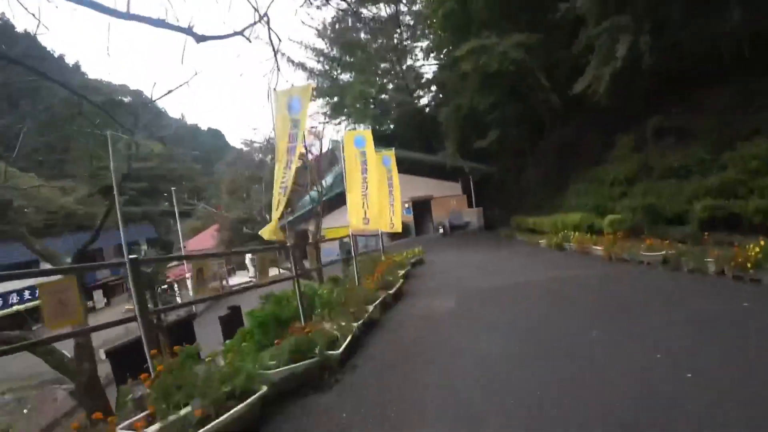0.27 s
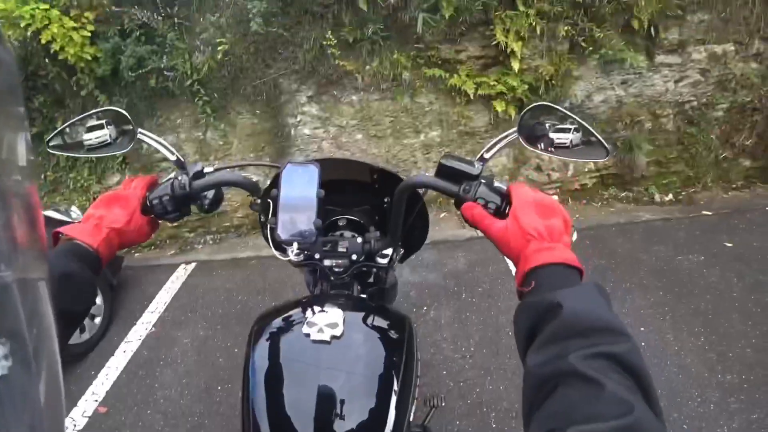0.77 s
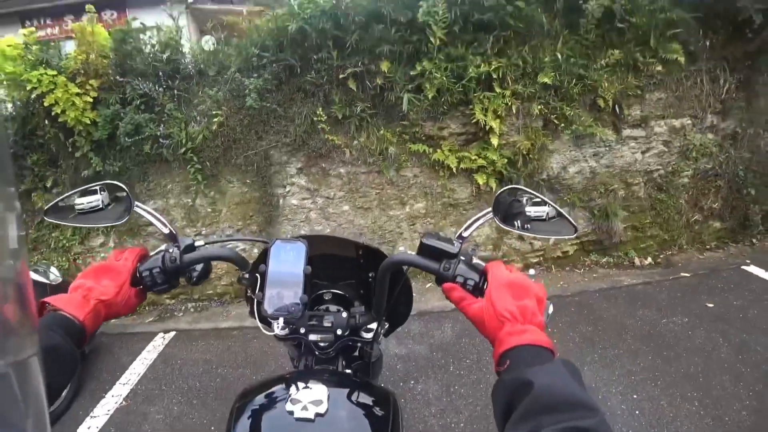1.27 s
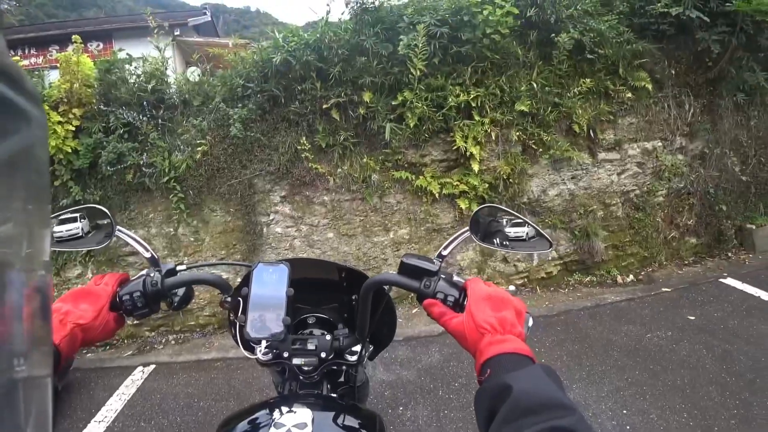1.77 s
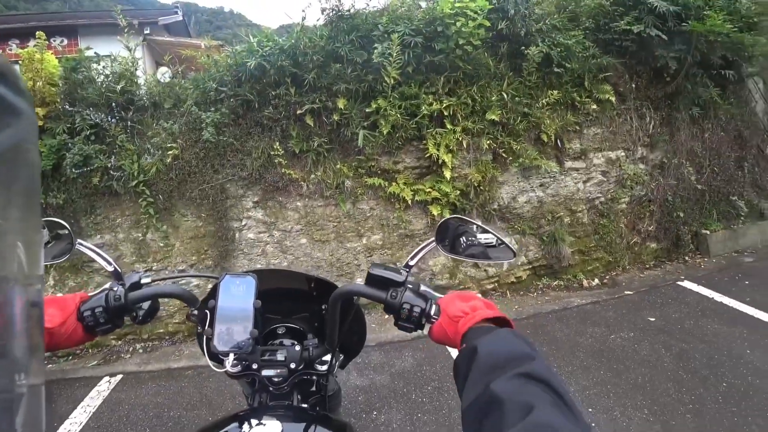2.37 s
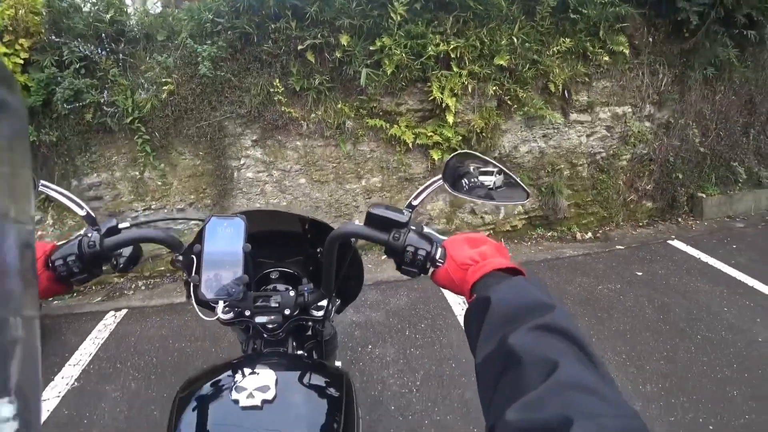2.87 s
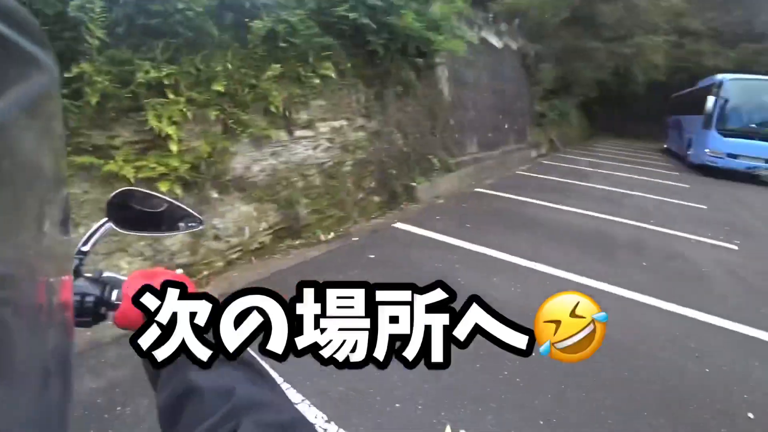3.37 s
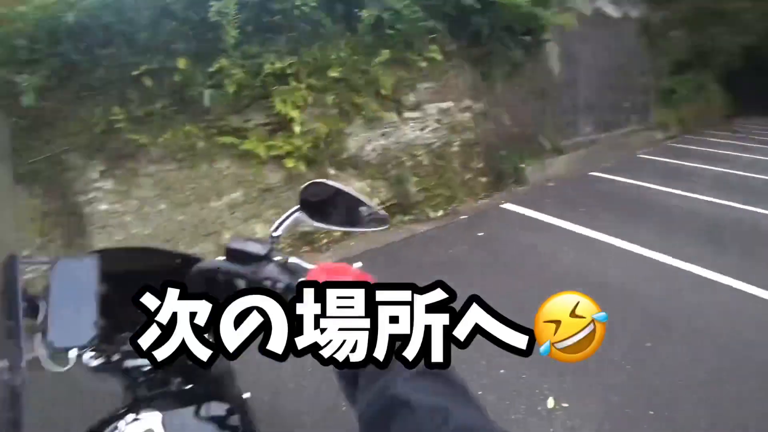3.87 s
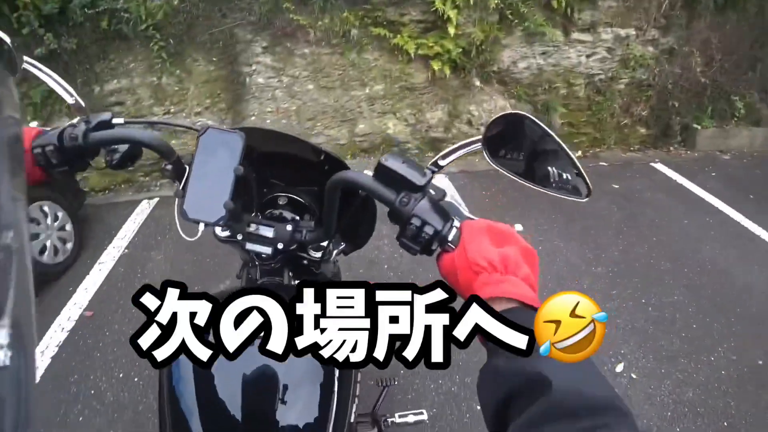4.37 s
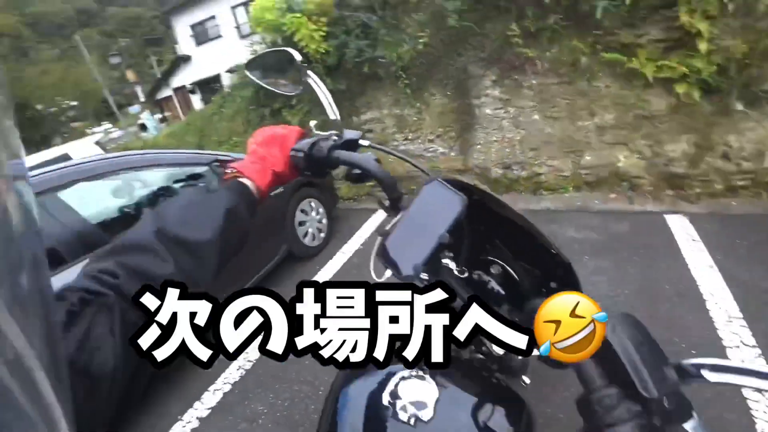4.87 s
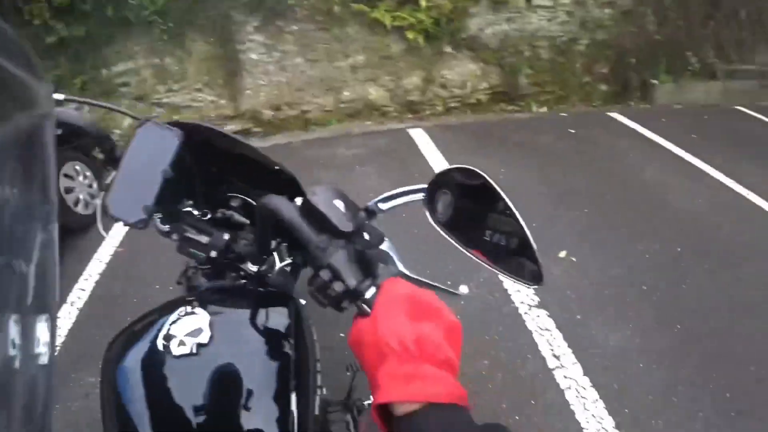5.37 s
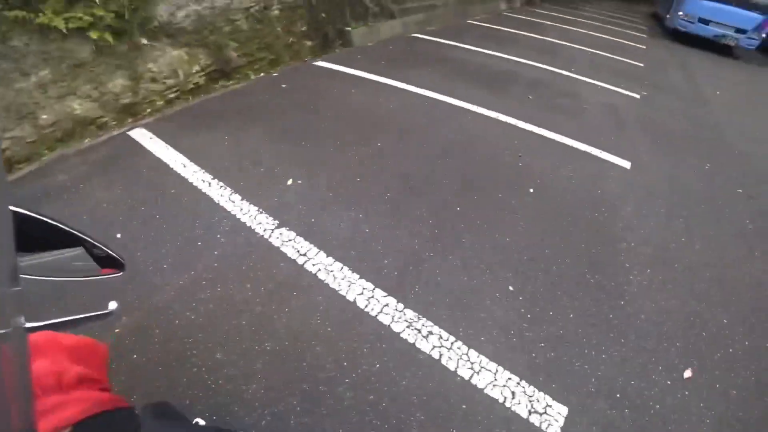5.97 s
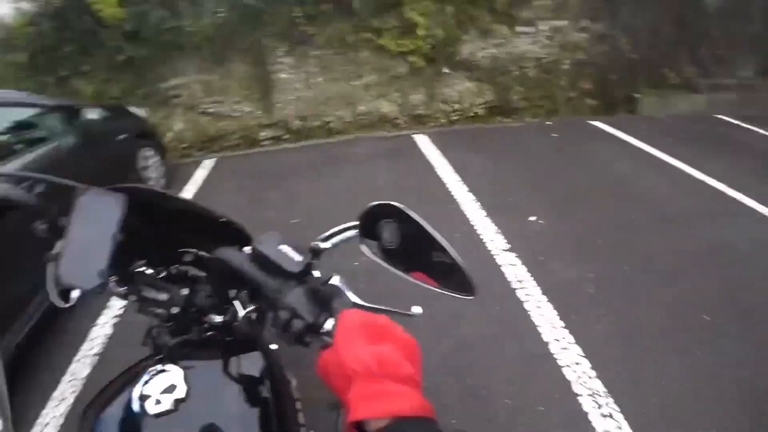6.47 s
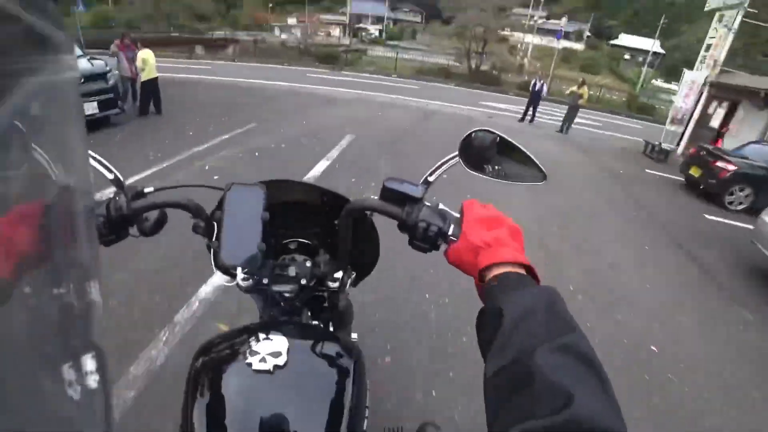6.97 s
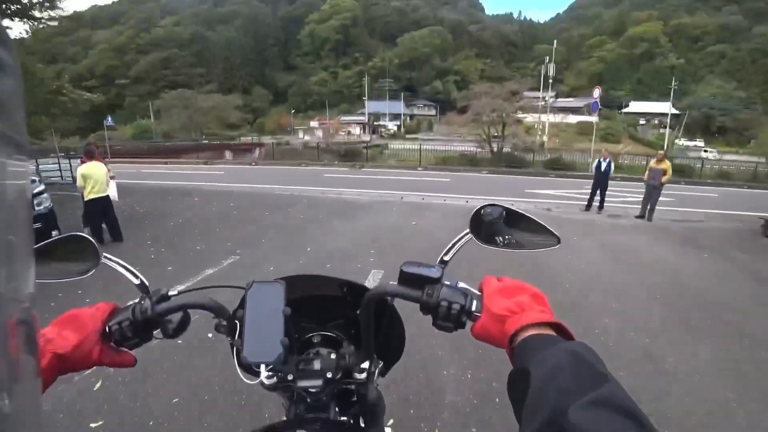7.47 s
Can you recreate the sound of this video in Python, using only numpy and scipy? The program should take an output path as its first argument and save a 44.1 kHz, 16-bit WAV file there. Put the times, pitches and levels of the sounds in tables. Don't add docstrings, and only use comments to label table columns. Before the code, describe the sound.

From 0 to 0.43 s there is only a faint outdoor wash with a few soft wind puffs. A hard cut brings a dull switch thump and short rattle at 0.46 s, with slight handling noises after. At 0.85 s the starter pinion crunches in sharply; gritty gears grind and the motor whine sags against compressions near 1.14, 1.37 and 1.6 s, with low frame kicks. At about 1.65 s a big V-twin catches in ragged pops, flares to its fastest near 2.2 s, then gradually slows from 3 s to a deep, uneven, loping idle by 6 s. Valve clatter, brief cover buzzes, intake chatter and a thin wavering gear whine ride above the exhaust. At 6.67 s a brief dip marks a cut to a slightly faster idle, easing until the end at 7.7 s. Close, dry, nearly mono helmet microphone, loud and limited.

```python
import sys
import numpy as np
from scipy import signal
from scipy.fft import rfft, irfft, next_fast_len
from scipy.io import wavfile
from scipy.ndimage import uniform_filter1d, minimum_filter1d

SR = 44100
rng = np.random.default_rng(int(sys.argv[2]) if len(sys.argv) > 2 else 0)


def persist_wave(psi):
    counts = np.round(np.clip(psi, -1, 1) * 32767).astype(np.int16)
    wavfile.write(sys.argv[1], SR, np.atleast_2d(counts).T)


def volts_from_decibels(level):
    exponent = np.asarray(level, float) / 20
    return 10 ** exponent


N = 340452
T = np.arange(N) / SR


def evened(x):
    return x / np.sqrt(np.mean(x ** 2) + 1e-20)


def curve(rows, column=1, rest=-120.):
    rows = np.asarray(rows, float)
    return np.interp(T, rows[:, 0], rows[:, column], rest, rest)


def coloured(points):
    f, db = np.transpose(points)
    size = next_fast_len(N)
    log_hz = np.log(np.fft.rfftfreq(size, 1 / SR) + 1)
    shape = volts_from_decibels(np.interp(log_hz, np.log(f), db, -120, -120))
    return evened(irfft(rfft(rng.standard_normal(N), size) * shape, size)[:N])


def band(x, lo_hz, hi_hz, order=2):
    return signal.sosfilt(signal.butter(order, [lo_hz, hi_hz], "band", fs=SR, output="sos"), x)


def resonate(x, hz, width_hz):
    r = np.exp(-np.pi * width_hz / SR)
    if np.isscalar(hz):
        return 2 * signal.lfilter([1 - r], [1, -r * np.exp(2j * np.pi * hz / SR)], x).real
    turn = np.exp(2j * np.pi * np.cumsum(hz) / SR)
    return 2 * (turn * signal.lfilter([1 - r], [1, -r], x * turn.conj())).real


def flutter(size):
    return evened(uniform_filter1d(uniform_filter1d(rng.standard_normal(N), size), size))


def grit(per_s, spread_db):
    struck = volts_from_decibels(spread_db * np.minimum(rng.exponential(1, N), 5))
    hits = struck * (rng.random(N) < per_s / SR)
    return evened(signal.lfilter([1], [1, -np.exp(-1 / (0.005 * SR))], hits))


def bursts(rows):
    gain = 0
    for s, rise, hold, fall, db in rows:
        away = np.maximum((s - T) / rise, (T - s - hold) / fall)
        gain = gain + volts_from_decibels(db - 30 * np.clip(away, 0, 5))
    return gain


def add(mix, s, sound):
    part = mix[round(s * SR):][:len(sound)]
    part += sound[:len(part)]


# t/s, rate/(cycles of two turns per s)
SPEED = [
    [(1.6561, 9.74), (1.9, 14.138), (2.2, 16.347), (2.6, 15.853), (3.0, 15.451), (3.6, 13.484),
     (4.3, 11.688), (4.8, 10.71), (5.3, 10.194), (5.9, 9.136), (6.3, 9.225), (6.64, 8.888)],
    [(6.6692, 11.475), (7.1, 10.828), (7.72, 10.095)],
]


def crank():
    turns, speed = np.zeros(N), np.full(N, 9.)
    for rows in SPEED:
        on = T >= rows[0][0]
        speed = np.where(on, np.interp(T, *np.transpose(rows)), speed)
        first = np.ceil(turns[np.argmax(on)])
        turns = np.where(on, first + np.cumsum(speed * on) / SR, turns)
    return uniform_filter1d(turns, size=1501, mode="nearest") - 1e-6, np.maximum(speed, 9)


def beats(turns, place):
    return np.flatnonzero(np.diff(np.floor(turns - place)) > 0)


# place/cycle, swell/ms
PLACES = [(-0.017, 0.9), (-0.004, 0.5), (0.182, 1.7), (0.195, 1.7), (0.215, 1.0), (0.505, 1.8), (0.51, 1.6),
          (0.618, 2.1), (0.874, 1.8)]
# slow f/Hz, fast f/Hz, width/Hz, slow pressure/1, fast pressure/1
RINGS = [(143, 135, 46, -0.12, -0.076), (60, 76, 11, -0.134, -0.125), (107, 128, 21, 0.09, -0.486),
         (46, 66, 11, 0.236, 0.359), (73, 98, 11, -0.118, -0.29), (72, 92, 17, 0.341, 0.251),
         (141, 173, 21, -0.079, -0.417), (155, 196, 11, 0.623, 0.691), (216, 151, 120, -0.057, 0.122)]
# t/s, level/dB
LOAD = [(1.6, -30), (1.66, -0.5), (2.8, 0), (5.2, 1.65), (5.65, 2), (6.64, 1.5), (6.7, -1), (7.72, -.5)]
STEADY, LOPE, COLD, WARM_S = .05, .17, .3, .4
TANK_HZ, TANK_WIDTH_HZ, TANK_DB = 212, 41, 0


def exhaust(turns, speed):
    fast = (speed - 9) / 7
    uneven = STEADY + LOPE * (1 - fast) ** 2 + COLD * np.exp(-abs(T - LOAD[0][0]) / WARM_S)
    out, t_ms = np.zeros(N), np.arange(-400, 401) / SR * 1000
    load_db = curve(LOAD)
    charge = rng.standard_normal(90)
    for (place, rise_ms), (slow_hz, fast_hz, width_hz, slow, quick) in zip(PLACES, RINGS):
        at = beats(turns, place)
        luck, train = rng.standard_normal((90, 2)), np.zeros(N)
        burn = .6 * charge[turns[at].astype(int)] + .8 * luck[:len(at), 0]
        late = (uneven[at] * luck[:len(at), 1] * 90).astype(int)
        pressure = slow + (quick - slow) * fast[at]
        train[np.minimum(at + late, N - 1)] = pressure * (1 + uneven[at] * burn) * SR / 20
        pulse = np.exp(-.5 * (t_ms / rise_ms) ** 2)
        train = signal.oaconvolve(train * volts_from_decibels(load_db), pulse / pulse.sum(), "same")
        out += resonate(train, slow_hz + (fast_hz - slow_hz) * fast, width_hz)
    tank = resonate(out, TANK_HZ, TANK_WIDTH_HZ)
    out += volts_from_decibels(TANK_DB - 8.1 * fast + 4.3 * load_db) * tank
    return signal.lfilter(*signal.butter(1, 40, "high", fs=SR), out)


FRONT, REAR_FAST, REAR_SLOW = -.035, .43, .575
# place/cycle, from t/s, to t/s, level/dB
CRACKS = [(FRONT, 2.25, 2.4, -10.5), (FRONT, 3.35, 3.96, -6.5), (FRONT, 3.96, 4.28, -9.5),
          (FRONT, 4.28, 5.8, -5.5), (FRONT, 5.8, 5.7, -15.5), (FRONT, 6.15, 6.6, -16),
          (REAR_FAST, 1.66, 2.5, -9.5), (REAR_SLOW, 1.66, 2.7, -15.5), (REAR_FAST, 2.5, 3.3, -20.5),
          (REAR_FAST, 3.0, 3.9, -17.5), (REAR_SLOW, 4.2, 6.64, -12)]
# t/s, level/dB
POPS = [(1.641, -7), (1.703, -6), (1.758, -4), (1.802, -6), (1.839, -4)]


def cracks(turns):
    out, t = np.zeros(N), np.arange(-100, 500) / SR
    fronts = []
    for place, start, end, db in CRACKS:
        fronts += [(s, db) for s in beats(turns, place) / SR if start <= s < end]
    for s, db in fronts + POPS:
        luck = rng.standard_normal(len(t) + 2)
        snap = np.sin(2 * np.pi * 215 * volts_from_decibels(.5 * luck[0]) * t)
        snap += 0.13 * luck[2:] * np.exp(-abs(t) / 0.0011)
        snap += .22 * np.sin(2 * np.pi * 560 * t) * np.exp(-abs(t) / .002)
        db += 1.5 * luck[1]
        add(out, s, volts_from_decibels(db) * snap * np.exp(-np.maximum(t / 0.0059, -t / 0.00055)))
    return band(out, 120, 1900, order=1)


# f/Hz, level/(dB per Hz)
VALVES = [(250, 14.5), (420, -0.5), (530, -4.5), (1120, -15), (1540, -14.5), (1690, -16.5), (2140, -14),
          (2590, -26.5), (3450, -23), (4070, -25), (4790, -31.5), (5200, -28), (6840, -33.5), (9370, -32.5),
          (11000, -36.5), (14400, -73.5), (22000, -120)]
# f/Hz, width/Hz, level/dB
COVERS = [(2910, 51, 4), (4410, 110, -7), (5100, 110, -2), (6260, 140, -6.5), (7430, 160, -7.5),
          (7800, 120, -11)]
# f/Hz, width/Hz, level/dB
AIRBOX = [(1350, 350, 5), (2298, 190, 9.5), (3000, 200, -2), (3280, 440, -14.5)]
# f/Hz, level/dB
WHINE = [(1450, -44), (1680, -50), (1790, -40), (1910, -43.5), (1960, -53.5), (2250, -48), (2550, -66)]
# t/s, level/dB, treble/dB
FACING = [(1.62, 0.5, 0), (1.9, 0.5, -1.5), (2.95, 1, -1), (3.08, 3, 2.5), (3.8, 0.5, 3), (3.88, 1.5, -0.5),
          (4.12, -0.5, -3.5), (4.2, 2, -8), (4.6, 2, -3.5), (5.0, 1.5, -0.5), (5.7, 2, 1.5), (6.2, 2, 2.5),
          (6.35, 1, -3.5), (6.8, 0.5, -2), (7.25, -3, 3.5), (7.34, 2, 2.5), (7.72, 1, 1)]
# t/s, rise/s, hold/s, fall/s, level/dB
SURGES = [
    (1.73, .05, 0.0097, 0.055, -56.5),
    (3.76, 0.046, 0.028, 0.064, -60.5),
    (4.33, .03, .01, 0.033, -55),
    (5.07, 0.045, 0.018, .1, -55.5),
]
# t/s, rise/s, hold/s, fall/s, level over ticking/dB
BRACKET = [
    (4.25, .05, .11, .15, 6.5),
    (6.5, .1, 0.11, .1, 4),
    (7.36, .05, .07, .1, 6),
]
BRACKET_HZ, TEETH_PER_CYCLE, WHINE_IN_S = 1400, 168, 2.2
CLATTER_DB, INTAKE_DB, INTAKE_SLOW_DB, INTAKE_FACING = -54, -60, 9, 0.54


def valve_gear(turns, speed):
    swell_db = 1.7 * np.cos(2 * np.pi * (turns - .3)) + 0.46 * np.cos(4 * np.pi * (turns - .05))
    swell_db += 1.67 * flutter(size=300)
    noise = coloured(VALVES)
    noise *= volts_from_decibels(-0.5) / np.std(band(noise, 3900, 16000, order=4))
    ticks = rng.standard_normal(N) * grit(300, 1.17)
    noise += volts_from_decibels(-5) * evened(sum(volts_from_decibels(db) * resonate(ticks, hz, w) for hz, w, db in COVERS))

    gulp = np.exp(3.5 * np.cos(2 * np.pi * (turns - .27)))
    huff = np.exp(12 * (np.cos(2 * np.pi * (turns - FRONT - .03)) - 1))
    gulp += volts_from_decibels(-8) * gulp.max() * huff
    air = rng.standard_normal(N) * gulp * volts_from_decibels(3 * flutter(size=400))
    air = evened(sum(volts_from_decibels(db) * resonate(resonate(air, hz, w), hz, 2 * w) for hz, w, db in AIRBOX))

    lope = 1 + 0.0058 * np.sin(4 * np.pi * turns)
    mesh_hz = TEETH_PER_CYCLE * speed
    tone = evened(resonate(rng.standard_normal(N), mesh_hz * lope, 40))

    noise += evened(resonate(ticks, BRACKET_HZ, 70)) * bursts(BRACKET)
    waver_db = 1.5 * flutter(size=900)
    facing_db = curve(FACING)
    noise += band(noise, 5800, 12000) * (volts_from_decibels(curve(FACING, column=2)) - 1)
    noise *= (volts_from_decibels(CLATTER_DB + facing_db) + bursts(SURGES)) * volts_from_decibels(swell_db)
    air_db = INTAKE_DB + INTAKE_SLOW_DB * (16 - speed) / 7 + INTAKE_FACING * facing_db
    noise += air * volts_from_decibels(air_db) * (turns > 0)
    clear = np.minimum(T - WHINE_IN_S, 0.28 + abs(T - CUTS[1][0]) / .5)
    tone_db = np.interp(mesh_hz, *np.transpose(WHINE)) + 0.78 * facing_db + waver_db
    return noise + tone * np.clip(clear, 0, 1) * volts_from_decibels(tone_db)


# t/s, rise/s, hold/s, fall/s, level/dB
SLIPS = [
    (1.45, 0.13, .04, .05, -31),
    (1.502, 0.0044, 0.0011, 0.018, -20),
]
# stall t/s, build-up/s, let-go/s, level/dB, motor f/Hz
STROKES = [
    (1.14, 0.27, .17, -20, 1430),
    (1.368, .16, 0.021, -18.5, 1500),
    (1.601, 0.1, 0.056, -19, 1600),
]
BITE_S, BUILD_DB = 0.039, -4
SAG_S, SAG_SHARE, SAG_DB = .11, .3, -7.5


def labour():
    load, whine = bursts(SLIPS), np.zeros(N)
    waver, throb = 1 + .012 * flutter(size=250), flutter(size=200)
    for s, build, let_go, db, hz in STROKES:
        before = np.clip((s - T) / build, 0, 1)
        stroke = bursts([(s - build + BITE_S, 2.0 * BITE_S, build - BITE_S, let_go, db)])
        load += stroke * volts_from_decibels(BUILD_DB * before)
        at = slice(round((s - SAG_S) * SR), round((s + 0.0081) * SR))
        u = np.linspace(0, 1, at.stop - at.start)
        turn = 2 * np.pi * np.cumsum(hz * (1 - SAG_SHARE * u ** 3) * waver[at]) / SR
        swell = np.sin(np.pi * u ** 1.85)
        for share, part_db in (1.01, 4.5), (.7, -3.5), (0.38, -10.5), (2.3, -25), (2.3, -11):
            gain = volts_from_decibels(db + SAG_DB + part_db + 6 + 2 * throb[at])
            whine[at] += np.sin(share * turn) * gain * swell
    return load, whine


# t/s, rise/s, hold/s, fall/s, level/dB
RATTLE = [
    (.462, 0.055, 0.042, .12, -26),
    (.6, 0.091, 0.11, .1, -44.5),
    (.74, 0.019, .003, .012, -40.5),
    (.84, 0.11, .005, 0.022, -29),
]
# f/Hz, level/(dB per Hz)
SWITCH = [(260, -28), (450, -23), (475, -12), (903, -1), (1070, -10), (1330, 0.5), (2890, -23), (3590, -24),
          (11000, -55), (14400, -61), (22000, -120)]
# t/s, rise/s, hold/s, fall/s, level/dB
CRUNCH = [
    (.847, .015, .006, .02, -17),
    (.857, .003, .004, .01, 0),
    (.866, .008, .002, .02, -14),
]
# f/Hz, level/(dB per Hz)
PINION = [(260, -36), (450, -12.5), (1150, -10), (1540, -2), (1990, -6), (2710, -15.5), (3540, -15),
          (4620, -23.5), (5080, -8), (6380, -26), (7590, -15), (8560, -24.5), (11000, -22.5), (14400, -52),
          (22000, -120)]
# f/Hz, level/(dB per Hz)
CASE = [(260, -51), (450, -26), (709, -7), (779, 2), (1030, -6), (1150, -6.5), (1420, -1), (1650, -5),
        (2340, -12), (3260, -20.5), (3780, -16.5), (4750, -21), (5500, -18.5), (7100, -18.5),
        (11000, -20.5), (14400, -65), (22000, -120)]
# f/Hz, width/Hz, level/dB
HOUSING = [(2384, 33, 3), (3040, 60, 5), (3780, 70, 0), (5940, 110, 5.5), (1495, 39, -3), (2210, 28, 12),
           (4170, 45, -2), (5400, 150, 3), (7560, 330, 7.5), (7840, 78, 3)]


def starter():
    out = coloured(SWITCH) * bursts(RATTLE) * volts_from_decibels(0.46 * flutter(size=200))
    out += coloured(PINION) * bursts(CRUNCH) * grit(2200, 2.0)
    hiss = evened(band(rng.standard_normal(N), 2500, 8100, order=1))
    out += hiss * volts_from_decibels(-49) * (T < 1.7)
    load, whine = labour()
    mesh = coloured(CASE) * (.5 + 0.25 * grit(900, 2.9))
    sag = 1 + 0.036 * flutter(size=1500)
    on = T < 2
    mesh = mesh[on] + sum(volts_from_decibels(db) * resonate(mesh[on], hz * sag[on], w) for hz, w, db in HOUSING)
    add(out, 0, evened(mesh) * load[on])
    return out + whine


# f/Hz, width/Hz, level/dB
BOOM = [(201.8, 40, -1), (262.7, 52, -0.3), (342, 26, -10.5)]
# t/s, rise/s, hold/s, fall/s, level/dB
SHAKES = [
    (.455, 0.032, 0.064, 0.11, -13),
    (.89, 0.3, 0.39, 1, -10.5),
]
# t/s, rise/s, hold/s, fall/s, level/dB
HEAVES = [
    (.47, 0.036, .01, 0.12, -21),
    (.62, .2, 0.2, 0.25, -31),
    (.95, 0.82, 0.14, 0.49, -16.5),
    (1.28, 0.33, .12, 0.37, -16.5),
    (1.64, 0.15, .05, .1, -8),
]
# t/s, peak level/dB, f/Hz, t60/s
KICKS = [
    (.462, -8, 248, 0.24),
    (1.369, 10.5, 143, 0.077),
    (1.445, -5, 64, 0.83),
    (1.585, -2, 267.4, 0.27),
    (1.612, 8.5, 110.6, 0.062),
    (1.659, -4.5, 95, 0.27),
    (1.7, 0, 158.4, 0.15),
]
STARTER_OUT_S = 1.68


def frame():
    knocks = rng.standard_normal(N) * volts_from_decibels(2 * flutter(size=150))
    boom = sum(volts_from_decibels(db) * resonate(resonate(knocks, hz, 0.95 * w), hz, 3 * w) for hz, w, db in BOOM)
    heave = evened(band(rng.standard_normal(N), 19, 135))
    out = evened(boom) * bursts(SHAKES) + heave * bursts(HEAVES)
    out *= np.clip((STARTER_OUT_S - T) / .04, 0, 1)
    t = np.arange(SR // 5) / SR
    for s, db, hz, t60 in KICKS:
        ring = volts_from_decibels(db - 60 * t / t60) * np.sin(2 * np.pi * hz * t)
        add(out, s, ring * signal.windows.tukey(len(t), .05))
    return out


# f/Hz, level/(dB per Hz)
LANE = [(35, -64), (60, -20), (593, -5.5), (633, -4.5), (938, -3), (1000, -3.5), (1840, -7.5), (4610, -12),
        (8310, -19), (11000, -28), (14400, -50), (22000, -120)]
LANE_DB = -52
# t/s, length/s, level/dB
PUFFS = [(0.142, 0.028, -40.5), (0.223, 0.059, -47), (0.254, 0.026, -50), (0.298, 0.019, -42.5),
         (.335, .01, -51), (0.364, 0.069, -44)]


def lane():
    out = coloured(LANE) * volts_from_decibels(LANE_DB + 1.4 * flutter(size=400))
    wind = evened(band(rng.standard_normal(N), 130, 390))
    for s, length, db in PUFFS:
        out += wind * volts_from_decibels(db) * np.clip(3 - 6 * abs((T - s) / length - .5), 0, 1)
    return out * (T < CUTS[0][0])


def scene():
    turns, speed = crank()
    mono = exhaust(turns, speed) + cracks(turns) + valve_gear(turns, speed) + frame() + starter()
    return np.tile(mono * (T >= CUTS[0][0]) + lane(), (2, 1))


def low_pass(x):
    return signal.sosfilt(signal.butter(12, 11190, fs=SR, output="sos"), x)


# t/s, fade out/s, fade in/s
CUTS = [
    (0.434, 0.015, 0.0086),
    (6.672, 0.026, 0.039),
]


def record(dry):
    room = minimum_filter1d(.97 / np.maximum(abs(dry[0]), .97), size=401)
    x = dry * uniform_filter1d(room, size=401)
    for s, out_s, in_s in CUTS:
        x = x * np.clip(np.maximum((s - T) / out_s, (T - s) / in_s), .03, 1)
    mismatch = volts_from_decibels(-27) * band(x[0], 400, 11000, order=1) * flutter(size=60)
    x = x + np.array([[1], [-1]]) * mismatch
    x = signal.oaconvolve(x, signal.firwin(401, 11150, fs=SR)[None], "same")
    return low_pass(x)


dry = scene()
out = record(dry)
persist_wave(out)
```